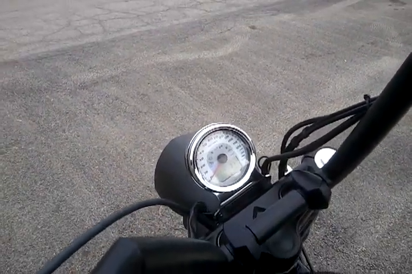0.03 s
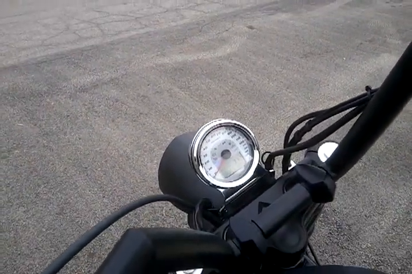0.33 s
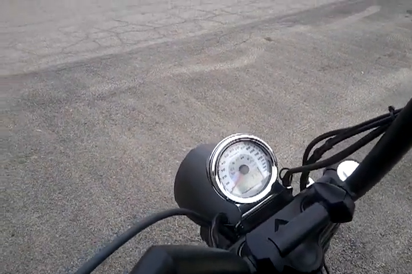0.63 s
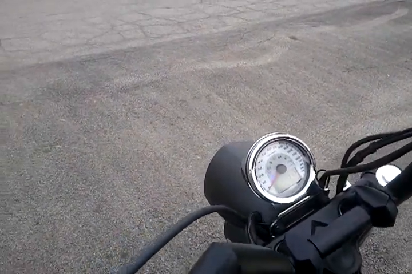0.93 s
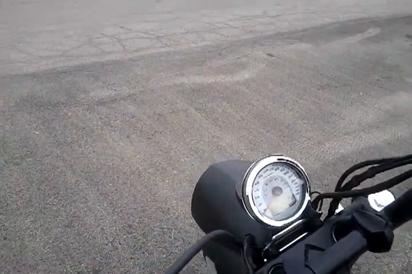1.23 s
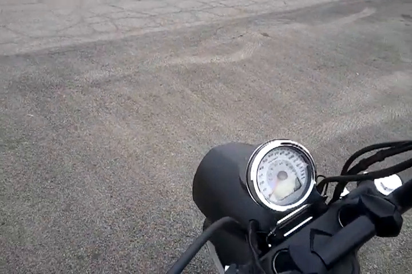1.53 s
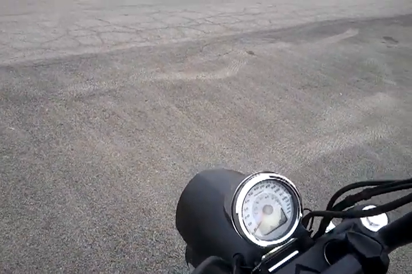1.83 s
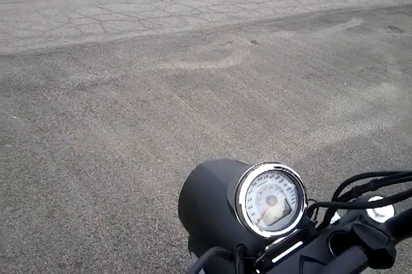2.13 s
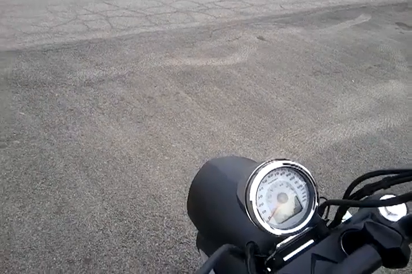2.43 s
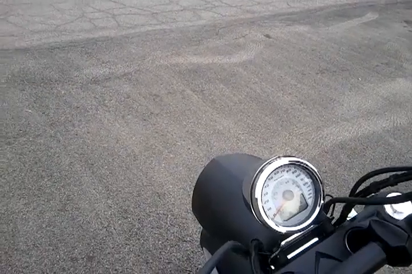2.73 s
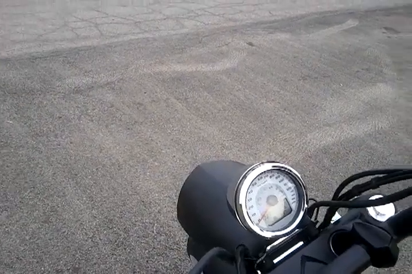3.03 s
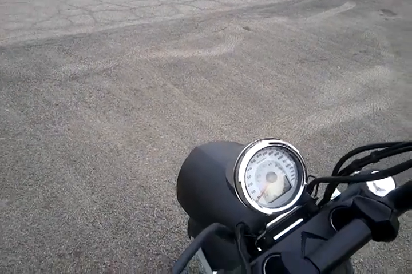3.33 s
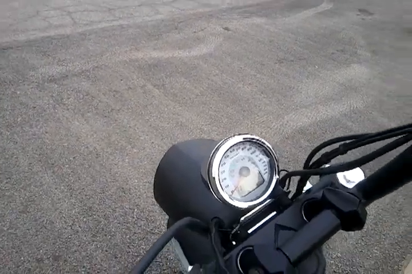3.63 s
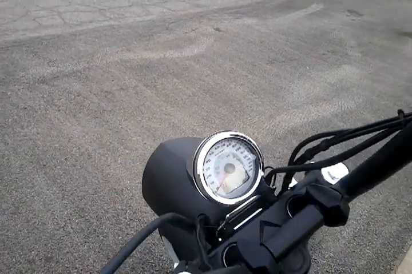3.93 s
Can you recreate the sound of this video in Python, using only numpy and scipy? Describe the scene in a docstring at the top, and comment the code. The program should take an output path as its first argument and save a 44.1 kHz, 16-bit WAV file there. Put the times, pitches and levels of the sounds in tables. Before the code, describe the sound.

A motorcycle is being started on a quiet paved lot, heard from the saddle. Switches and levers click lightly, one snaps with a metallic ring, then the starter whines briefly and the engine fires at the very end.

```python
"""A motorcycle is started on a quiet paved lot, heard from the saddle, with faint birds far off.
Hands click the switches and levers, which sets the handlebar ringing and the hollow tank humming.
The solenoid (the starter's magnetic switch) clacks, and the starter gears whine up, slow down as
the engine squeezes its first air, and recover. The engine fires and the exhaust pipe booms."""
import sys
import numpy as np
from scipy import signal
from scipy.fft import rfft, irfft
from scipy.io import wavfile

SR = 44100
rng = np.random.default_rng(int(sys.argv[2]) if len(sys.argv) > 2 else 0)


def wrap_up_sound(samples):
    """Save the sound to the file named by the first command line argument, as 16-bit audio."""
    columns = np.atleast_2d(samples).T
    # keep every value between -1 and 1, then stretch to whole-number steps
    tamed = np.clip(columns, -1, 1)
    steps = np.round(tamed * 32767).astype(np.int16)
    wavfile.write(sys.argv[1], SR, steps)


N = 176400
T = np.arange(N) / SR

# tone of rushing gas, in the intake and the exhaust: (frequency [Hz], relative level [dB])
GAS_TONE = [(60, -2), (150, -7), (300, 3.5), (420, 8.5), (600, -11.5), (1300, -14.5), (3000, -20),
            (8000, -49.5)]


def from_db(db):
    """Turn decibels into a number to multiply by."""
    return 10 ** (np.asarray(db) / 20)


def unit_level(x):
    """Scale a signal so that its average strength (rms) is 1."""
    return x / np.sqrt(np.mean(x ** 2) + 1e-20)


def curves(rows):
    """Join a table's timed points with straight lines, one curve per column after the time."""
    times, *columns = np.transpose(rows)
    return [np.interp(T, times, column) for column in columns]


def since(start):
    """Seconds since a moment, zero before it."""
    return np.maximum(T - start, 0)


def fade(start, fade_s):
    """Stay at 1 until the start, then fall by 60 dB every fade_s seconds."""
    return np.exp(-np.log(1000) * since(start) / fade_s)


def swell(middle, half_length):
    """A smooth rise and fall around a moment."""
    return np.cos(np.pi / 2 * np.clip((T - middle) / half_length, -1, 1)) ** 2


def drift(hz):
    """A random wobble of strength 1; a higher hz makes it quicker."""
    smoothing = signal.butter(2, hz, fs=SR, output="sos")
    return unit_level(signal.sosfilt(smoothing, rng.standard_normal(N)))


def noise(tone):
    """Noise of strength 1, shaped by rows of (frequency [Hz], relative level [dB])."""
    hz, db = np.transpose(tone)
    freqs = np.maximum(np.arange(N // 2 + 1) * SR / N, 1)
    gain = from_db(np.interp(np.log(freqs), np.log(hz), db)) * np.minimum(freqs / hz[0], 1)
    return unit_level(irfft(rfft(rng.standard_normal(N)) * gain, N))


def outdoors():
    """Distant rumble and hiss fill the open air."""
    # tone of the background: (frequency [Hz], relative level [dB])
    air_tone = [(25, -3.5), (45, -0.5), (80, -2), (128, 0), (175, -5.5), (250, -8.5), (400, -13),
                (900, -17), (1500, -22), (2600, -27), (4000, -28), (6200, -30.5), (7500, -35)]
    # loudness of the background: (time [s], level [dB])
    air_levels = [(0, -52), (.8, -50), (1.5, -50), (2.4, -50), (2.9, -50.5), (3.5, -49)]
    air_db, = curves(air_levels)
    return from_db(air_db) * noise(air_tone)


def treble_flicker():
    """A faint high tone wanders and flickers in the hiss."""
    hz = 6020 + 530 * drift(41)
    db = -75.5 + 7.5 * np.minimum(drift(25), 2)
    return from_db(db) * np.sin(2 * np.pi * np.cumsum(hz) / SR)


def birds():
    """Far birds chirp, each chirp a short sliding whistle."""
    # chirps: (time [s], length [s], start pitch [Hz], end pitch [Hz], level [dB])
    chirps = [(.30, 0.13, 4400, 4280, -70), (0.636, 0.044, 3370, 3920, -58.5),
              (.695, .025, 3550, 3680, -65), (1.239, .025, 3380, 3500, -62), (1.46, 0.029, 3270, 3500, -59),
              (2.811, .05, 3900, 3300, -63)]
    out = np.zeros(N)
    for start, length, start_hz, end_hz, db in chirps:
        progress = np.clip((T - start) / length, 0, 1)
        hz = start_hz + (end_hz - start_hz) * progress
        out += from_db(db) * np.sin(np.pi * progress) * np.sin(2 * np.pi * np.cumsum(hz) / SR)
    return out


def click_shape(start, length):
    """A click rises, holds and dies; longer ones leave more rattle in the handlebar."""
    fall_s, tail_s, tail_db = 0.0014, 0.026, -8.5
    after_end = since(start + length)
    hit = np.minimum(since(start) / (0.61 * length), 1) * np.exp(-after_end / fall_s)
    tail = from_db(tail_db) * min(length / 0.0081, 1) * (T > start) * np.exp(-after_end / tail_s)
    return np.hypot(hit, tail)


def controls():
    """Switches and levers hit their stops, each a burst of noise in four bands from low to high."""
    # contacts: (time [s], length [s], thud [dB], body [dB], clack [dB], tick [dB])
    clicks = [(.021, 0.0031, -53, -53, -57, -45), (0.561, 0.0023, -66, -50, -55, -36.5),
              (1.127, .011, -48.5, -41, -47, -53), (1.144, 0.02, -55, -46, -54, -60),
              (1.3007, 0.0025, -49, -41, -45.5, -55), (1.447, 0.0027, -65, -41, -48, -47),
              (1.994, 0.011, -69, -48.5, -51.5, -60), (2.149, 0.016, -46, -49.5, -49, -58),
              (2.338, 0.0099, -58, -60, -60, -59), (2.511, 0.027, -68, -59, -53.5, -57.5),
              (2.54, 0.0087, -38.5, -28.5, -26, -28.5), (3.056, 0.013, -71, -40.5, -45.5, -45),
              (3.131, 0.0064, -47, -44.5, -44.5, -69), (3.213, 0.0057, -62, -64, -57, -77),
              (3.236, 0.014, -52, -54.5, -49, -47), (3.28, 0.014, -43.5, -45.5, -57, -63),
              (3.561, 0.011, -66, -63, -54, -45.5)]
    # edges of the thud, body, clack and tick bands: (frequency [Hz])
    edges = [200, 400, 1100, 2400, 7500]
    shapes = np.array([click_shape(start, length) for start, length, *_ in clicks])
    band_gains = from_db(np.array(clicks)[:, 2:]).T
    out = np.zeros(N)
    for gains, band in zip(band_gains, zip(edges, edges[1:])):
        band_filter = signal.butter(4, band, "band", fs=SR, output="sos")
        out += (gains @ shapes) * unit_level(signal.sosfilt(band_filter, rng.standard_normal(N)))
    return out


def ring(start, hz, db, fade_s):
    """One fading note of a struck part."""
    wave = np.sin(2 * np.pi * (hz * since(start) + rng.random()))
    return (T > start) * from_db(db) * fade(start, fade_s) * wave


def handlebar():
    """Small fittings ring after light clicks; the steel bar rings when the main switch snaps."""
    # notes of the fittings: (time [s], pitch [Hz], level [dB], time to fade 60 dB [s])
    fitting_notes = [(.563, 6160, -38, 0.022), (1.152, 778, -34, .08), (1.156, 1820, -38.5, 0.064),
                     (1.303, 1290, -43, .012), (2.157, 560, -44.5, 0.13), (2.157, 1360, -51, .12),
                     (3.063, 1263, -42, .17), (3.062, 2500, -48, .12), (3.063, 3710, -39, 0.089),
                     (3.061, 4170, -45, .07), (3.135, 550, -41.5, 0.082), (3.135, 1706, -51, 0.15),
                     (3.218, 1880, -50, .06)]
    # notes of the bar: (pitch [Hz], level [dB], time to fade 60 dB [s])
    bar_notes = [(475, -35.5, 0.17), (575, -39, 0.055), (687, -33.5, .12), (896, -40.5, .2),
                 (1560, -40.5, 0.27), (1764, -36.5, 0.16), (1893, -43.5, 0.33), (1975, -45.5, .27),
                 (2336, -42.5, 0.27), (2525, -41, 0.23), (2950, -31.5, 0.079), (5060, -39, 0.13),
                 (4800, -43, 0.16), (5500, -32.5, 0.091), (6804, -56, .15)]
    snap_s = 2.5455
    bar = sum(ring(snap_s, *note) for note in bar_notes)
    return bar + sum(ring(*note) for note in fitting_notes)


def sleeve():
    """A sleeve brushes softly as the hand moves between the controls."""
    # brushes: (middle time [s], half length [s], level [dB])
    brushes = [(0.967, 0.054, -58.5), (1.407, 0.32, -63), (1.655, 0.45, -66), (2.666, 0.04, -55.5)]
    # tone of the cloth: (frequency [Hz], relative level [dB])
    cloth_tone = [(400, -8), (1200, 5), (3500, 5), (6000, 2.5), (7500, -3)]
    return sum(from_db(db) * swell(middle, half) for middle, half, db in brushes) * noise(cloth_tone)


def tank():
    """After a knock the hollow tank hums one low note that swells, holds and fades."""
    # knocks: (time [s], hold [s], level [dB])
    knocks = [(1.994, .04, -40.5), (2.15, 0.07, -40.5), (2.553, 0.027, -49.5), (2.974, 0.058, -51),
              (3.255, 0.056, -46)]
    hum_hz, rise_s, fade_s, waver_db = 275.7, 0.0069, 0.23, 2
    level = sum(from_db(db) * (1 - np.exp(-since(start) / rise_s)) * fade(start + hold, fade_s)
                for start, hold, db in knocks)
    return level * from_db(waver_db * drift(35)) * np.sin(2 * np.pi * hum_hz * T)


def solenoid():
    """The solenoid's steel plunger lands with a bright chink."""
    # tone of the plunger: (frequency [Hz], relative level [dB])
    plunger_tone = [(200, -20), (1200, -26), (2700, -8.5), (4800, -8), (5500, -5), (6050, 7.5), (6600, -4),
                    (7200, 6.5), (8000, -10.5)]
    start, length, rise_s, fall_s = 3.581, .005, .001, 0.0024
    shape = np.minimum(since(start) / rise_s, 1) * np.exp(-since(start + length) / fall_s)
    return from_db(-21) * shape * noise(plunger_tone)


def starter():
    """Gear teeth whine and rattle, hardest when the air squeezed in the engine slows them."""
    # speed of the gears: (time [s], teeth meeting per second [Hz])
    gear_speed = [(3.584, 348.4), (3.61, 619), (3.64, 818.8), (3.67, 1062), (3.70, 1200), (3.725, 1299),
                  (3.762, 1372), (3.785, 1315), (3.80, 1214), (3.815, 1087), (3.83, 895.6), (3.845, 854),
                  (3.865, 672), (3.885, 763), (3.902, 873.5), (3.94, 1078), (4.0, 1275)]
    # strain on the starter: (time [s], relative whine level [dB], relative rattle level [dB])
    strain = [(3.584, -44, -34), (3.62, -40, -34), (3.642, -35, -29), (3.652, -41, -32),
              (3.667, -27.5, -30), (3.69, -42, -32), (3.73, -34.5, -27), (3.775, -34.5, -25.5),
              (3.805, -21.5, -27.5), (3.832, -26, -23), (3.848, -36.5, -26.5), (3.868, -30, -31.5),
              (3.885, -46, -32.5), (3.905, -37.5, -27.5), (3.93, -50, -30), (4.0, -40.5, -30)]
    # tones in the whine: (multiple of the tooth rate, relative level [dB])
    whine_tones = [(.385, -9), (1, -2.5), (1.78, -8.5), (2, 0), (3, -1), (4, -3.5), (5, -7), (6, -18)]
    # tone of the rattle: (frequency [Hz], relative level [dB])
    rattle_tone = [(40, -20), (130, 0.5), (350, 0), (700, -1), (1200, -3), (2200, -3.5), (3600, -9),
                   (5200, -5.5), (6700, -5.5), (8000, -11.5)]
    start_s, speed_wobble, flutter_db, grain_db = 3.584, 0.00787, 3.5, 2
    tooth_hz, = curves(gear_speed)
    whine_db, rattle_db = curves(strain)
    running = T > start_s
    phase = 2 * np.pi * np.cumsum(tooth_hz * (1 + speed_wobble * drift(147))) / SR
    whine = np.zeros(N)
    for multiple, db in whine_tones:
        level = from_db(whine_db + db + flutter_db * drift(70))
        blur = 0.11 * np.sqrt(multiple) * drift(120)
        whine += running * level * np.sin(multiple * phase + blur)
    whine *= 1 + 0.24 * np.sin(.11 * phase)   # the small gear is off-centre: one throb per turn
    rattle = running * from_db(rattle_db + grain_db * drift(400) - 2) * noise(rattle_tone)
    shaking = from_db(6) * whine + from_db(-2.5) * rattle
    return from_db(-5) * whine + rattle + engine_case(shaking)


def engine_case(shaking):
    """The engine case rings at its own pitches when it is shaken."""
    # notes of the case: (pitch [Hz], width [Hz], gain [dB])
    case_notes = [(508, 23, -5.5), (1322, 23, 7.5), (1764, 58, 9.5), (1985, 59, -1), (2393, 67, -1.5),
                  (4390, 43, -5), (4650, 57, 5), (5080, 150, -1.5), (6870, 60, 7.5)]
    out = np.zeros(N)
    for hz, width_hz, db in case_notes:
        decay = np.exp(-np.pi * width_hz / SR)   # share of the ringing left after one sample
        feed = np.array([1, 0, -1]) * (1 - decay ** 2) / 2
        feedback = [1, -2 * decay * np.cos(2 * np.pi * hz / SR), decay ** 2]
        out += from_db(db) * signal.lfilter(feed, feedback, shaking)
    return out


def with_echoes(sound):
    """The ground and a nearby wall send back later, quieter copies of a sound."""
    # echoes: (delay [s], gain [dB])
    echoes = [(.0043, -17.5), (0.0269, -9)]
    return sound + sum(from_db(db) * np.interp(T - delay, T, sound) for delay, db in echoes)


def intake():
    """Air rushes through the engine as it turns over."""
    return from_db(-35.5) * swell(middle=3.912, half_length=0.048) * noise(GAS_TONE)


def exhaust():
    """Each firing sends out a thump and a blast of gas; the first sets the pipe booming."""
    # firings: (time [s], thump level [dB], blast level [dB])
    firings = [(3.9224, -12.5, -26.5), (3.990, -37, -15.5)]
    thump_s, blast_rise_s, blast_fall_s = 0.0049, .002, .014
    pipe_hz, climb_hz_per_s, boom_rise_s = 58.3, 410, 0.011   # hot gas raises the pipe's pitch
    out, gas = np.zeros(N), noise(GAS_TONE)
    for start, thump_db, blast_db in firings:
        age = since(start)
        out -= from_db(thump_db) * np.sin(np.pi * np.minimum(age / thump_s, 1)) ** 2
        out += from_db(blast_db) * gas * np.minimum(age / blast_rise_s, 1) * np.exp(-age / blast_fall_s)
    first_firing = firings[0][0]
    age = since(first_firing)
    cycles = pipe_hz * age + climb_hz_per_s * age ** 2 / 2
    boom_level = from_db(-12.5) * (1 - np.exp(-age / boom_rise_s)) * fade(first_firing, fade_s=1.7)
    return out - boom_level * np.sin(2 * np.pi * cycles)


def scene():
    """Add all the sounds together in one channel."""
    hands = controls() + handlebar() + tank() + sleeve()
    engine = solenoid() + with_echoes(starter()) + intake() + exhaust()
    return (hands + engine + outdoors() + birds() + treble_flicker())[None]


def record(dry):
    """Soften the treble, cut off the very top and shift the whole wave a little below zero."""
    soften_hz, cutoff_hz, offset = 6790, 8037, -.09
    soft = signal.sosfilt(signal.butter(10, soften_hz, fs=SR, output="sos"), dry)
    return offset + signal.sosfilt(signal.ellip(10, .2, 80, cutoff_hz, fs=SR, output="sos"), soft)


dry = scene()
out = record(dry)
wrap_up_sound(out)
```